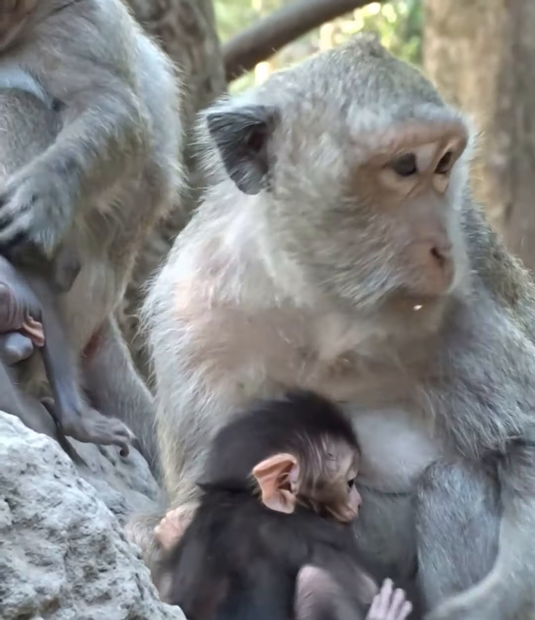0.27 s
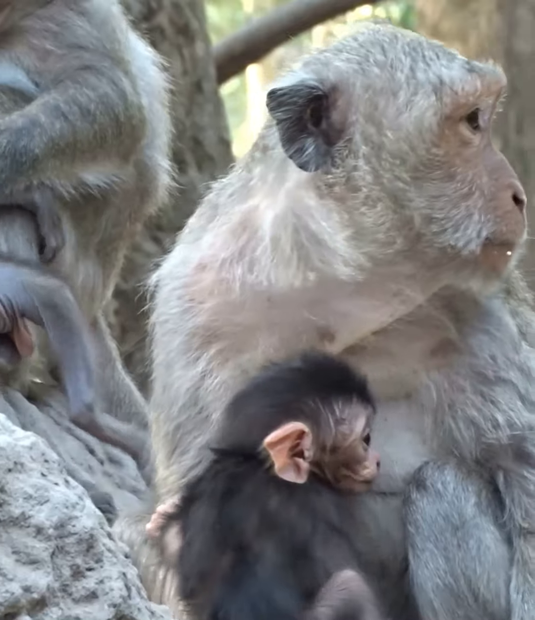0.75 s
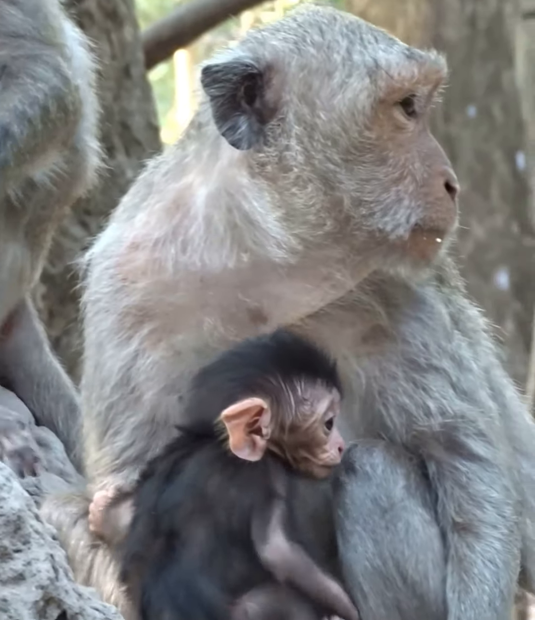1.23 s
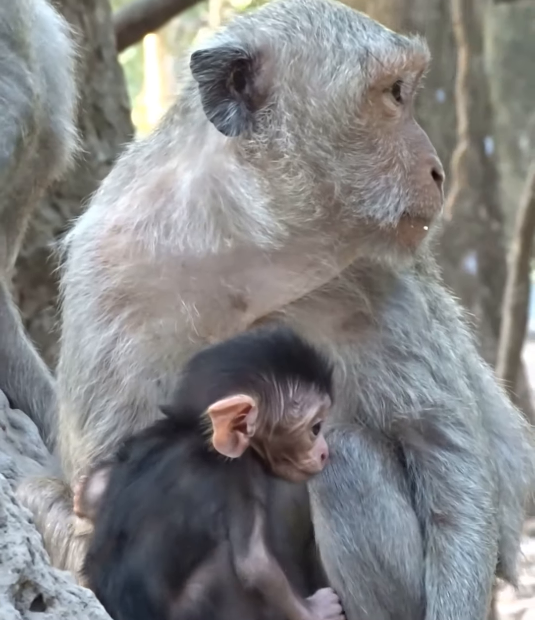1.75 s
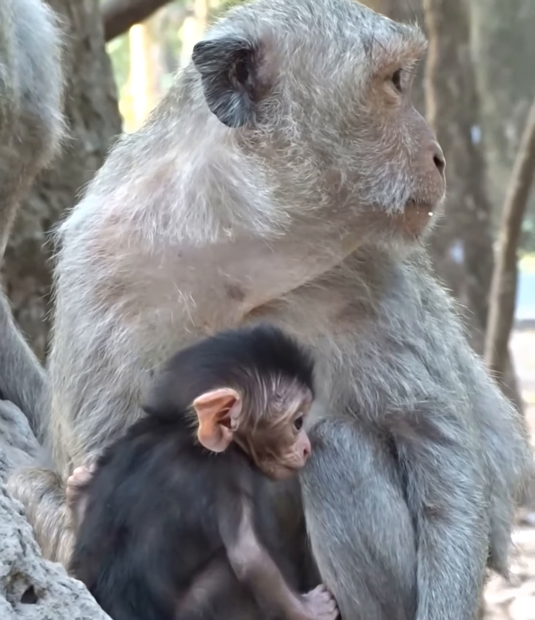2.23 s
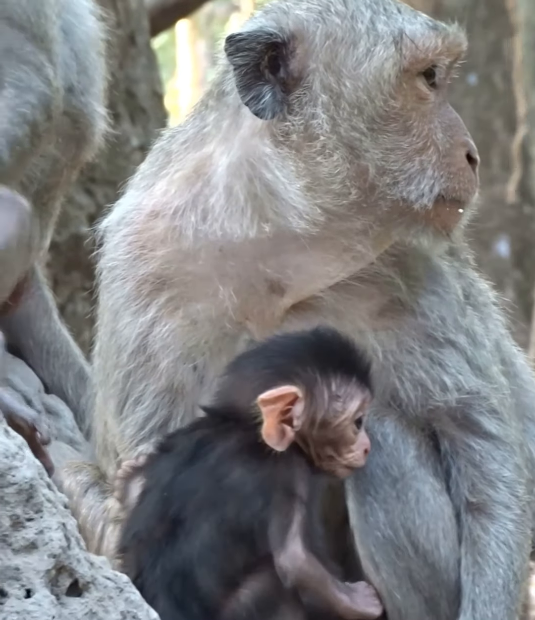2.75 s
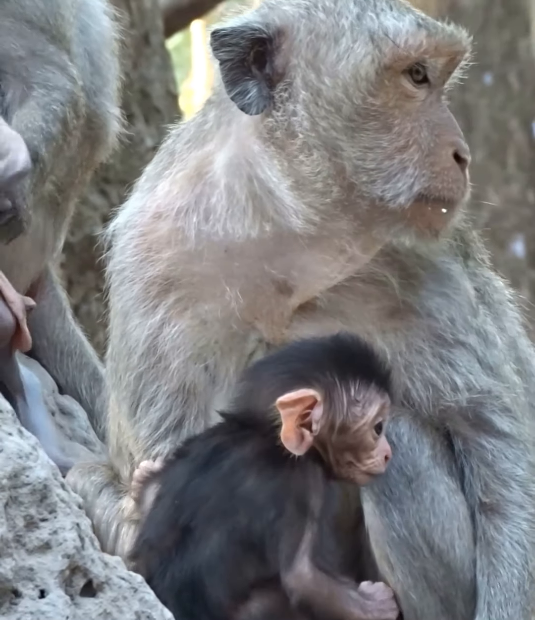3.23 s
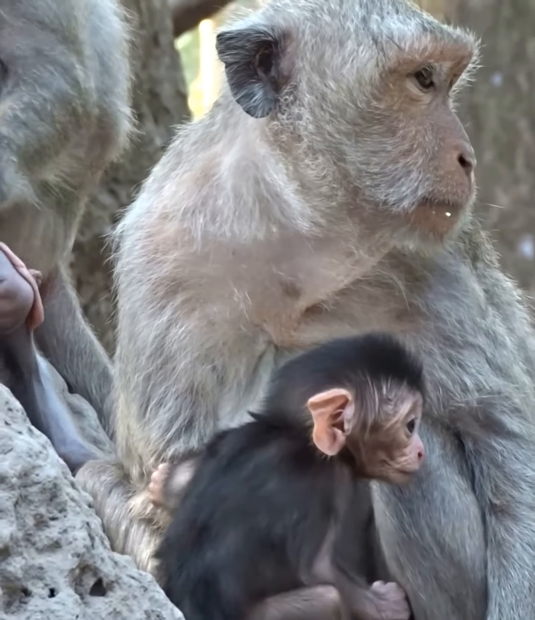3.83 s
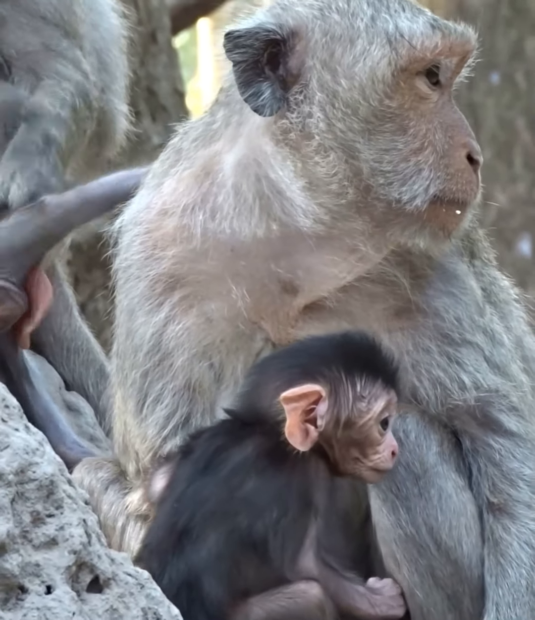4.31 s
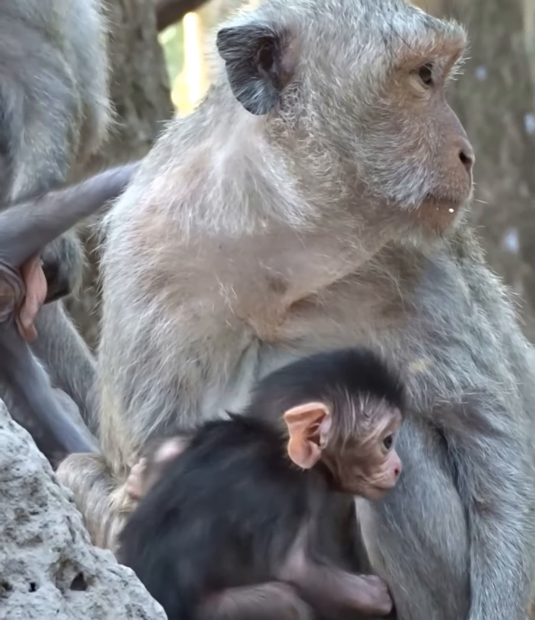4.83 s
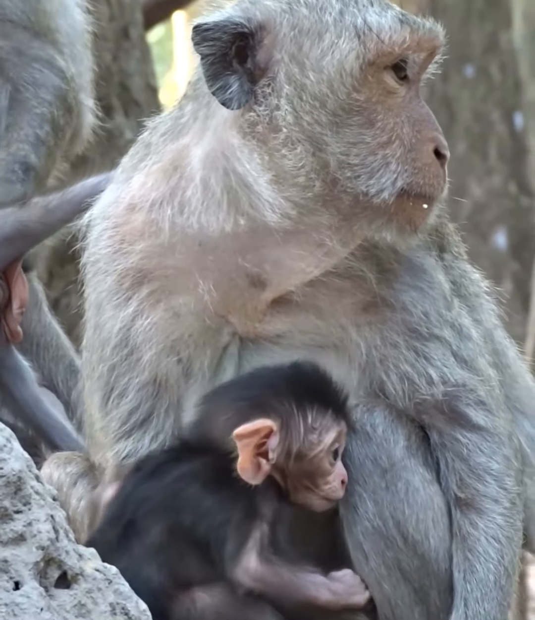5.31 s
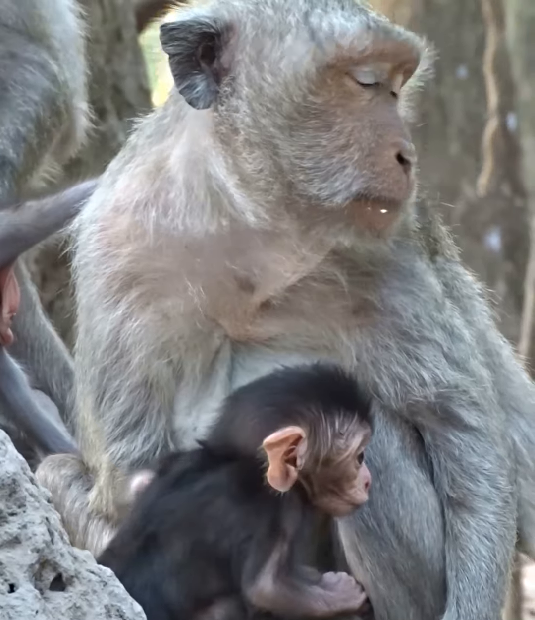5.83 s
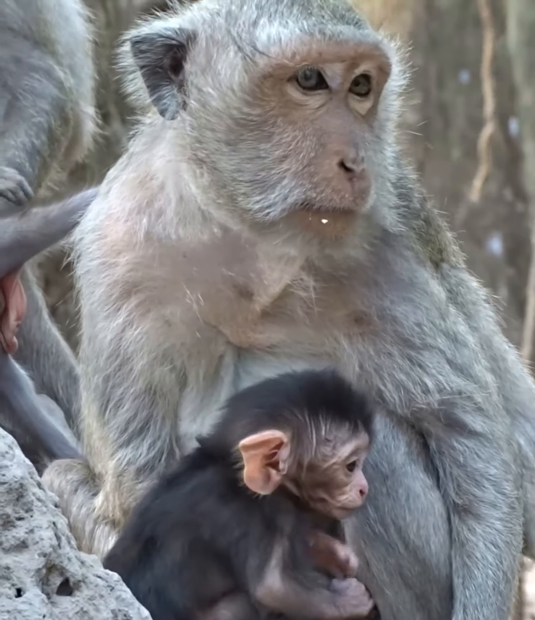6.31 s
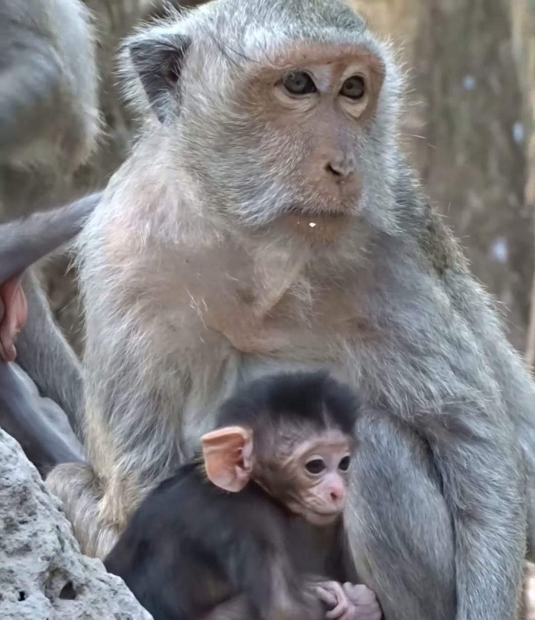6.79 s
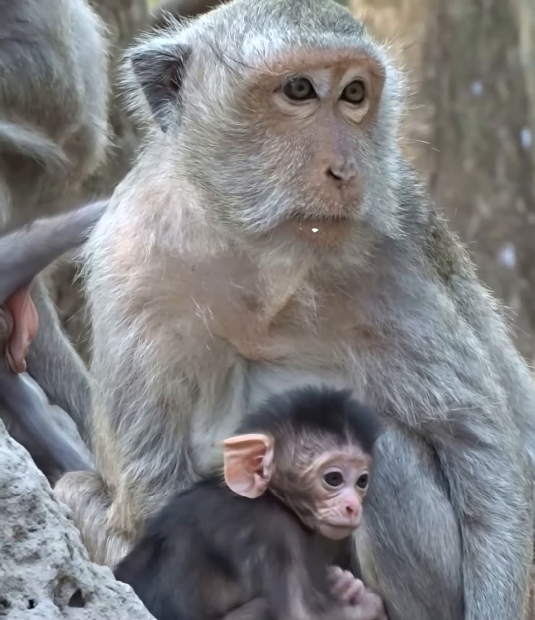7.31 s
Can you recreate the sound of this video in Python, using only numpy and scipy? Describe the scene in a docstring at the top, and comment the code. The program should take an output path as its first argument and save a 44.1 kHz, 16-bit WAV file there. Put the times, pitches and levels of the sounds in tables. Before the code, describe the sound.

A young monkey close by lets out one piercing squeak and a brief raspy scream about halfway through, the loudest sounds in an echoing wood. A second monkey, farther away, follows with a run of soft whimpers and a few cries that turn hoarse as they drop. Around them, high birds whistle and peep, animals scuff dry leaves, snap twigs and tap wood softly, while leaves hiss and traffic rumbles far off.

```python
"""A young macaque close by gives a pure squeak, then a rough scream: two tones mixing in one throat.
Further off among the trees another whimpers, then cries out, turning hoarse as its pitch falls.
Small birds whistle in the canopy, with thin peeps and faint far tones around them. Dry leaves rustle
and twigs snap under moving animals, wood is tapped softly, and the microphone clicks once. Trunks and
leaves scatter the calls into echoes, while the foliage hisses and distant traffic rumbles."""
import sys
import numpy as np
from scipy import signal
from scipy.fft import rfft, irfft, next_fast_len
from scipy.io import wavfile
from scipy.ndimage import map_coordinates

SR = 44100
rng = np.random.default_rng(int(sys.argv[2]) if len(sys.argv) > 2 else 0)


def wrap_up_sound(samples):
    """Save the sound to the file named by the first command line argument, as 16-bit audio."""
    columns = np.atleast_2d(samples).T
    # keep every value between -1 and 1, then stretch to whole-number steps
    tamed = np.clip(columns, -1, 1)
    steps = np.round(tamed * 32767).astype(np.int16)
    wavfile.write(sys.argv[1], SR, steps)


N = 332945
TIME = np.arange(N) / SR

# how wide a noise sounds: (frequency [Hz], side level minus middle level [dB])
STEREO_WIDTH = [(60, -29), (110, -22.5), (200, -16.5), (380, -9), (700, -6), (1290, -7), (2380, -6.5),
                (4400, -17), (8120, -18), (15000, -7)]
# the echo among the trunks: (frequency [Hz], time to fade by 60 dB [s])
ECHO_TIMES = [(300, 1.2), (3000, 1.38), (5000, 0.9), (7500, 0.6), (14000, 0.56)]
# tone colours of engines, tyres and foliage: (frequency [Hz], relative level [dB])
RUMBLE_COLOUR = [(13, -43), (22, -31), (41, -5.5), (92, -1), (119, -2), (263, -15.5), (420, -26.5),
                 (550, -65), (920, -120)]
TYRE_COLOUR = [(150, -35), (300, 0.5), (450, 2.5), (570, -1), (780, 2), (1000, -2), (1300, -6.5),
               (2000, -11), (3500, -12), (8000, -29)]
FOLIAGE_COLOUR = [(900, 1), (1900, -4.5), (2700, 2.5), (3300, 0.5), (4200, -2), (5300, 3.5), (7200, 6),
                  (9000, 2), (11000, -5.5), (13500, -10.5), (16000, -15)]
# vehicles swelling out of the rumble: (middle time [s], width [s], rise [dB])
VEHICLES = [(.9, 0.77, 1.2), (1.8, .15, 3.5), (2.7, 0.49, 2.5), (3.55, 0.37, 1.5), (4.45, 0.39, 3),
            (7.1, 0.52, 0.7)]
# how the tyre noise and the foliage swell and fade: (time [s], level [dB])
TYRE_LEVELS = [(0, -47.5), (1, -49.5), (3.85, -51.5), (4.15, -49), (7.55, -48)]
FOLIAGE_LEVELS = [(0, -53.5), (2.55, -54.5), (3.1, -46), (3.7, -47.5), (4.35, -44), (5.45, -46.5),
                  (6.45, -45.3), (7.55, -50)]
# two birds' sliding notes: (start [s], length [s], direction [1 up, -1 down], level [dB])
HIGH_BIRD_NOTES = [(-.03, 0.096, 1, -44.5), (.165, 0.13, -1, -48.5), (.302, 0.093, 1, -46),
                   (.885, .12, 1, -46.5), (1.47, 0.093, 1, -48), (2.01, 0.11, -1, -47.5),
                   (2.147, .14, 1, -49), (2.85, .1, 1, -46.5), (5.04, 0.14, -1, -49),
                   (5.191, .11, 1, -45.5), (6.416, .13, 1, -45.5)]
LOW_BIRD_NOTES = [(4.841, 0.061, 1, -55), (5.199, 0.071, 1, -51), (5.33, 0.093, -1, -63)]
# faint tones far off: (start [s], length [s], pitch [Hz], level [dB])
FAR_TONES = [(.8, .9, 2390, -63.5), (1.6, .85, 2390, -67), (1.95, .65, 3310, -64), (3.6, 2, 690, -60),
             (2.85, .2, 305, -54)]
# scuffs in the leaves: (middle time [s], width [s], level [dB], place [0 ahead to 1 right])
LEAF_SCUFFS = [(.24, 0.037, -50, 0), (1.56, .018, -49, 0), (1.61, 0.032, -47, 0), (2.24, 0.14, -50, 0.1),
               (2.77, 0.049, -41, 0.046), (3.02, 0.031, -51, 0), (3.195, 0.046, -40, 0),
               (4.31, 0.046, -40.5, 0), (5.02, 0.1, -43.5, 0), (6.16, 0.025, -33, .8),
               (6.207, 0.023, -34.5, 0.34), (6.54, 0.053, -42, 1), (6.67, .013, -42.5, 0.88),
               (6.74, 0.024, -45.5, 1), (6.94, 0.0056, -33, 0.87), (6.97, 0.038, -38, 1),
               (7.44, 0.0092, -38, 0.89), (7.49, 0.051, -38.5, 0.48)]
# twig snaps, and one sharp click on the microphone at 5.58 s:
# (time [s], level [dB], knock adjustment [dB])
SNAPS_AND_CLICK = [(1.5419, -36, -14), (2.569, -39, -14), (2.643, -35.5, -5.5), (3.175, -23, -4.5),
                   (4.288, -26.5, -11), (5.579, -28, 0.5), (6.1509, -32, -3), (6.5505, -29, -6),
                   (6.672, -33, -22), (6.8089, -33, -21), (6.9317, -26, -19), (7.4257, -32, -2)]
# tone colours of a scuff, a crack and a knock: (frequency [Hz], relative level [dB])
LEAF_COLOUR = [(150, 9), (700, 0.5), (1500, -4), (2800, 6.5), (4200, 0.5), (7500, 8.5), (10000, 1.5),
               (13000, -6), (16000, -12)]
CRACK_COLOUR = [(1500, -24), (4000, 6), (7500, 7.5), (11000, 3), (16000, -16)]
KNOCK_COLOUR = [(150, -10), (700, -2), (1400, 0), (2800, 0), (4500, -5), (8000, -16)]
# dull taps on wood: (time [s], level [dB], pitch [Hz])
WOOD_TAPS = [(1.555, -45.5, 1780), (1.6, -50, 2170), (2.78, -43, 1275), (4.548, -40.5, 2880),
             (4.79, -44, 1720), (5.33, -41, 1796), (6.2, -39, 2380), (6.23, -41, 387), (6.67, -39, 422)]
# the peeps; the near squeak with two soft notes before it: (start [s], length [s], first pitch [Hz],
# top pitch [Hz], last pitch [Hz], rise [s], fall [s], fade-in [s], level [dB])
PEEP_NOTES = [(2.28, 0.059, 7400, 7570, 7400, 0.025, .01, 0.035, -35),
              (2.34, .12, 7920, 8020, 6800, 0.0095, 0.12, .006, -35),
              (4.46, 0.045, 3950, 5450, 5450, 0.044, .005, .005, -38),
              (4.532, .105, 6550, 7240, 5500, 0.0146, 0.074, .008, -32)]
SQUEAK_NOTES = [(3.245, 0.055, 6270, 6290, 6160, .015, 0.017, 0.029, -34.5),
                (3.305, .016, 6260, 6300, 6290, .005, .005, 0.0046, -35),
                (3.322, .167, 6625, 7150, 4160, .072, .048, 0.0049, -12.5)]
# the far macaque's whimpers: (start [s], level [dB])
WHIMPER_RUN = [(3.299, -46), (3.619, -43), (3.95, -44), (4.24, -46), (4.559, -44), (4.921, -46),
               (5.242, -46)]
# a whimper's overtones: (multiple of the pitch, relative level [dB])
WHIMPER_OVERTONES = [(2, -8), (3, -1), (4, 4), (6, 2.5), (8, -35)]
# the scream's high tone: (time [s], pitch [Hz])
SCREAM_HIGH_TONE = [(3.764, 6930), (3.776, 7700), (3.797, 8560), (3.815, 8300), (3.865, 8820), (3.91, 8170),
                    (4.0, 8290), (4.027, 7170), (4.098, 7180)]
# bursts of the same throat's lower tone:
# (start [s], length [s], first pitch [Hz], last pitch [Hz], level [dB], roughness [0 clear, 1 up rough])
SCREAM_LOW_TONES = [(3.426, 0.02, 4800, 4730, -34, 0.1), (3.802, 0.037, 4800, 4670, -32, 1.1),
                    (3.846, 0.033, 4580, 4880, -26, 0.4), (3.898, .05, 4540, 5380, -26, 0.7),
                    (3.954, 0.041, 4980, 4860, -22.5, 0.14)]
# tone colour of the air rushing through that throat: (frequency [Hz], relative level [dB])
RASP_COLOUR = [(2500, -25), (3700, -13), (4600, 4.5), (6500, 3), (8800, 0.5), (10200, 0), (12500, -0.5),
               (14000, -14), (16000, -18)]
# how strongly the near voice beams into the trees: (frequency [Hz], relative level [dB])
VOICE_BEAM = [(5000, -10), (7000, -1), (8500, 2), (12500, -4), (14300, 10)]
# the far macaque's cries: (start [s], length [s], first pitch [Hz], top pitch [Hz], last pitch [Hz],
# rise [s], fall [s], level [dB], mouth resonance [Hz], roughness [0 to 1])
FAR_CRIES = [(5.595, 0.2, 773, 854, 830, 0.14, 0.018, -42, 2860, .55),
             (5.765, 0.25, 837, 1026, 866, .036, .11, -32.5, 3980, 0.17),
             (6.948, .265, 837, 1006, 907.5, .062, .16, -36, 3200, 0.44)]
# tone colour of its throat: (frequency [Hz], relative level [dB])
THROAT_COLOUR = [(900, -14), (2000, -7), (3000, -5.5), (4000, 0), (4700, -6), (5200, -2.5), (6100, -3),
                 (7100, -3), (8100, -12), (9100, -2), (10000, -19), (15000, -28)]


def amp(db):
    """Turn decibels into a number to multiply a sound by."""
    return 10 ** (np.asarray(db) / 20)


def unit(x):
    """Scale a sound to an average power of 1."""
    return x / np.sqrt(np.mean(x ** 2) + 1e-20)


def at_hz(table, hz):
    """Read a (frequency, value) table between its rows, on a musical pitch scale."""
    freqs, values = np.transpose(table)
    return np.interp(np.log(hz + 1), np.log(freqs + 1), values)


def at_time(table, t=TIME):
    """Read a (time, value) table between its rows."""
    return np.interp(t, *np.transpose(table))


def window(start, length):
    """The sample numbers of an event, and the time since its start."""
    i = np.flatnonzero((TIME >= start) & (TIME < start + length))
    return i, TIME[i] - start


def envelope(t, fade_in, fade_out):
    """A volume that rises, holds and falls to nothing at the end of t."""
    return np.clip(t / fade_in, 0, 1) * np.clip((t[-1] - t) / fade_out, 0, 1)


def wobble(rate, size=N):
    """A smooth curve through `rate` random values a second."""
    points = rng.standard_normal(int(size * rate / SR) + 4)
    return map_coordinates(points, [np.arange(size) * rate / SR])


def phase_of(hz):
    """How far a wave has turned, in radians, as it follows a pitch curve."""
    return 2 * np.pi * np.cumsum(hz) / SR


def arch(t, from_hz, top_hz, end_hz, rise, fall, rise_bend, fall_bend):
    """The pitch of a call: it climbs to its top, holds and drops."""
    up = np.clip(t / rise, 0, 1) ** rise_bend
    down = np.clip(1 - (t[-1] - t) / fall, 0, 1) ** fall_bend
    return from_hz + (top_hz - from_hz) * up + (end_hz - top_hz) * down


def filtered(x, response):
    """Multiply each frequency in x by response(frequency)."""
    size = next_fast_len(N + SR // 4)
    return irfft(rfft(x, size) * response(np.fft.rfftfreq(size, 1 / SR)), size)[..., :N]


def noise(colour, wider_db=0):
    """Stereo noise of a given tone colour; its bass is nearly the same in both ears."""
    def response(hz):
        side_db = np.minimum(at_hz(STEREO_WIDTH, hz) + wider_db, -3)
        return amp(at_hz(colour, hz)) * amp([0 * hz, side_db])
    mid, side = filtered(rng.standard_normal((2, N)), response)
    return unit(np.array([mid + side, mid - side]))


def among_trees(x, echo_db, side_db, build_s=0.0076):
    """A sound plus its echo off trunks and leaves; the treble dies first."""
    hz, t, spectrum = signal.stft(rng.standard_normal((2, SR)), SR, nperseg=256)
    decay = amp(-60 * t / at_hz(ECHO_TIMES, hz)[:, None])
    tail = signal.istft(spectrum * decay, SR, nperseg=256)[1]
    tail *= 1 - np.exp(-(np.arange(tail.shape[1]) / SR / build_s) ** 2)
    mid, side = signal.fftconvolve(x[None], tail / np.linalg.norm(tail[0]), axes=1)[:, :N]
    side = side * amp(side_db)
    return (x + amp(echo_db) * np.array([mid + side, mid - side])) / np.sqrt(1 + amp(echo_db) ** 2)


def traffic(rumble_db=-40.5, throb_db=0.5):
    """A distant rumble that swells as vehicles pass, with tyre noise a little to the left."""
    swell_db = sum(db * np.exp(-((TIME - middle) / width) ** 2) for middle, width, db in VEHICLES)
    rumble = unit(noise(RUMBLE_COLOUR) * amp(throb_db * wobble(25)))
    tyres = amp(at_time(TYRE_LEVELS)) * noise(TYRE_COLOUR) * amp([[.55], [-.55]])
    return amp(rumble_db + swell_db) * rumble + tyres


def foliage(boost_db=1.5):
    """Stirring leaves make a faint, grainy hiss."""
    stir_db = .5 * wobble(14)
    hiss = unit(noise(FOLIAGE_COLOUR) * amp(stir_db + 1.5 * wobble(500)))
    return amp(at_time(FOLIAGE_LEVELS) + boost_db) * hiss


def bird_slides(notes, low_hz, high_hz, bend=.9):
    """One bird whistles pure notes that slide up or down across its range."""
    out = np.zeros(N)
    for start, length, direction, db in notes:
        i, t = window(start, length)
        from_hz, to_hz = (low_hz, high_hz) if direction > 0 else (high_hz, low_hz)
        hz = from_hz + (to_hz - from_hz) * (t / length) ** bend
        swell = np.sqrt(np.abs(np.sin(np.pi * t / length)))
        waver = 1 + .014 * wobble(300, len(i))
        out[i] += np.sqrt(2) * amp(db) * swell * np.sin(phase_of(hz * waver))
    return out


def birds():
    """Two birds in the canopy, heard mostly by their echo."""
    high = bird_slides(HIGH_BIRD_NOTES, low_hz=4540, high_hz=7300)
    low = bird_slides(LOW_BIRD_NOTES, low_hz=2105, high_hz=2550)
    return among_trees(high + low, echo_db=5.5, side_db=-10, build_s=.015)


def far_tones(first_pip_s=-0.053, every_s=.445, pip_s=0.12, pip_hz=2840, pip_db=-61.5):
    """A distant bird repeats one pip six times; a few other faint tones waver far off."""
    out = np.zeros(N)
    pips = [(first_pip_s + k * every_s, pip_s, pip_hz, pip_db) for k in range(6)]
    for start, length, hz, db in FAR_TONES + pips:
        i, _ = window(start, length)
        waver_hz = 22 * wobble(150, len(i))
        out[i] += np.sqrt(2) * amp(db) * signal.windows.tukey(len(i)) * np.sin(phase_of(hz + waver_hz))
    return among_trees(out, echo_db=0, side_db=-4.5) * amp([[.8], [-.8]])


def leaf_scuffs(grain_db=3):
    """Animals brush through dry leaves: grainy swells of noise, ahead and (wider) on the right."""
    ahead_power, right_power = np.zeros((2, N))
    for middle, width, db, place in LEAF_SCUFFS:
        power = amp(2 * db) * np.exp(-np.minimum(((TIME - middle) / width) ** 2, 100))
        ahead_power += (1 - place) * power
        right_power += place * power
    grain = amp(grain_db * wobble(700))
    ahead = np.sqrt(ahead_power) * unit(noise(LEAF_COLOUR) * grain)
    right = np.sqrt(right_power) * unit(noise(LEAF_COLOUR, wider_db=3.5) * grain)
    return ahead + right * amp([[-1], [1]])


def snaps_and_click(crack_db=-4, knock_db=-3):
    """Twig snaps and one sharp click on the microphone: each is a bright crack with a duller knock."""
    crack, knock = np.zeros((2, N))
    for start, db, adjust_db in SNAPS_AND_CLICK:
        i, t = window(start, .15)
        fade = amp(db - 60 * t / .015) + amp(db - 16 - 60 * t / .12)  # a sharp burst, then a soft tail
        crack[i] += amp(crack_db) * fade
        knock[i] += amp(knock_db + adjust_db) * fade
    return crack * noise(CRACK_COLOUR) + knock * noise(KNOCK_COLOUR)


def wood_taps(ring_s=0.11, fade_in_s=0.00095, blur=0.3):
    """A soft touch makes wood ring briefly: a narrow band of noise around one pitch."""
    out = np.zeros(N)
    t = np.arange(SR // 8) / SR
    for start, db, hz in WOOD_TAPS:
        flicker = wobble(blur * hz, len(t)) + 1j * wobble(blur * hz, len(t))
        ring = unit((flicker * np.exp(2j * np.pi * hz * t)).real)
        fade = amp(db - 60 * t / ring_s) * (1 - np.exp(-t / fade_in_s))
        out[round(start * SR):][:len(t)] += fade * ring
    return among_trees(out, echo_db=-13.5, side_db=-1)


def arched_notes(notes, octave_db, jitter, rise_bend, fall_bend):
    """Nearly pure notes with a weak octave above, loudest at the top of their pitch."""
    out = np.zeros(N)
    for start, length, from_hz, top_hz, end_hz, rise, fall, fade_in, db in notes:
        i, t = window(start, length)
        hz = arch(t, from_hz, top_hz, end_hz, rise, fall, rise_bend, fall_bend)
        softer_db = 17 * np.tanh(np.log2(top_hz / hz) / 0.2)
        level = amp(db - softer_db) * envelope(t, fade_in, fade_out=0.0025)
        phase = phase_of(hz * (1 + jitter * wobble(397, len(i)) + 0.0034 * wobble(54, len(i))))
        out[i] += np.sqrt(2) * level * (np.sin(phase) + amp(octave_db) * np.sin(2 * phase))
    return out


def peeps():
    """Short, slightly hoarse peeps from a little way off."""
    voice = arched_notes(PEEP_NOTES, octave_db=-24, jitter=.013, rise_bend=1.1, fall_bend=1.6)
    return among_trees(voice, echo_db=-3, side_db=-13)


def near_macaque():
    """A clean squeak, then the scream; the treble beams into the trees and returns as an echo."""
    squeak = arched_notes(SQUEAK_NOTES, octave_db=-32, jitter=0.0043, rise_bend=1.9, fall_bend=2.9)
    voice = squeak + scream()
    beamed = filtered(voice, lambda hz: amp(at_hz(VOICE_BEAM, hz)))
    echo = among_trees(beamed, echo_db=35, side_db=-12, build_s=0.004)
    return voice + amp(-6.5) * echo


def far_whimpers(first_hz=890, tiring_hz_per_s=19, droop_hz_per_s=110):
    """Hoarse, drooping whimpers, about three a second, each a little lower as the voice tires."""
    out = np.zeros(N)
    for start, db in WHIMPER_RUN:
        i, t = window(start, length=0.38)
        hz = first_hz - tiring_hz_per_s * (start - WHIMPER_RUN[0][0]) - droop_hz_per_s * t
        waver = .024 * wobble(300, len(i)) + .012 * wobble(18, len(i))
        phase = phase_of(hz * (1 + waver))
        voice = unit(sum(amp(level) * np.sin(k * phase) for k, level in WHIMPER_OVERTONES))
        out[i] += amp(db) * envelope(t, fade_in=0.02, fade_out=0.35) * voice
    return among_trees(out, echo_db=-1, side_db=-8.5)


def vocal_fold(hz, rough, jitter, scatter, blur_hz):
    """A vibrating vocal fold, as a complex wave; roughness breaks its tone into random bursts."""
    size = len(hz)
    rough = np.clip(rough, 0, 1)
    phase = phase_of(hz * (1 + jitter * rough * wobble(500, size)))
    flicker = wobble(blur_hz, size) + 1j * wobble(blur_hz, size)
    drive = (1 - rough) + scatter * np.sqrt(rough) * flicker
    swing = drive / np.sqrt(1 + np.abs(drive) ** 2)  # the fold can only swing so far
    return np.sqrt(2) * swing / np.sqrt(np.mean(np.abs(swing) ** 2)) * np.exp(1j * phase)


def scream(high_db=-19, rasp_db=-28, break_at_s=3.797, break_s=0.019, recover_s=.235):
    """Two tones in one throat mix into new ones, over a rasp of rushing air."""
    high, low = np.zeros((2, N), complex)
    since_break = TIME - break_at_s  # the voice suddenly turns rough, then clears steadily
    rough = np.clip(1.5 * np.minimum(since_break / break_s, 1 - since_break / recover_s), 0, 1)
    i = np.flatnonzero((TIME >= SCREAM_HIGH_TONE[0][0]) & (TIME <= SCREAM_HIGH_TONE[-1][0]))
    hz = at_time(SCREAM_HIGH_TONE, TIME[i])
    tone = vocal_fold(hz, rough[i] + 0.065, jitter=.025, scatter=.8, blur_hz=850)
    flutter_db = 2.7 * rough[i] * wobble(44, len(i))
    fade = envelope(TIME[i] - TIME[i[0]], fade_in=0.016, fade_out=.055)
    high[i] = amp(high_db + flutter_db) * fade * tone
    for start, length, from_hz, to_hz, db, roughness in SCREAM_LOW_TONES:
        i, t = window(start, length)
        hz = np.linspace(from_hz, to_hz, len(i))
        tone = vocal_fold(hz, roughness, jitter=.03, scatter=.6, blur_hz=800)
        low[i] += amp(db) * envelope(t, fade_in=0.0073, fade_out=0.0073) * tone
    # multiplying complex waves adds their pitches; with conj() it subtracts them
    beat = high * low.conj()
    mixed = amp(3) * high * low + amp(19) * high * beat + amp(36) * beat ** 2 + amp(-14) * high ** 2
    rasp = amp(rasp_db) * np.sqrt(rough) * noise(RASP_COLOUR)[0]
    return (high + low + mixed).real + rasp


def far_cries(resting_mouth_hz=2830, mouth_width_hz=650, slack_octaves=0.14):
    """Arched cries turn hoarse and dull as they fall; the mouth boosts overtones near its resonance."""
    out = np.zeros(N)
    k = np.arange(1, 15)[:, None]  # multiples of the pitch
    for start, length, from_hz, top_hz, end_hz, rise, fall, db, open_hz, roughness in FAR_CRIES:
        i, t = window(start, length)
        hz = arch(t, from_hz, top_hz, end_hz, rise, fall, rise_bend=0.98, fall_bend=1.3)
        slack = np.clip(np.log2(top_hz / hz) / slack_octaves, 0, 1)  # 0 at the top pitch, 1 well below
        rough = np.clip(roughness + .7 * slack, 0, 1)
        mouth_hz = open_hz + (resting_mouth_hz - open_hz) * slack ** 2
        phase = phase_of(hz * (1 + .028 * rough * wobble(600, len(i))))
        mouth_db = (8 - 7.5 * slack) * np.exp(-((k * hz - mouth_hz) / mouth_width_hz) ** 2)
        dulling_db = 9 * rough * np.minimum(np.abs(np.log2(k * hz / mouth_hz)), 1)
        gains = amp(at_hz(THROAT_COLOUR, k * hz) + mouth_db - dulling_db)
        swell_db = 3 * (np.sin(np.pi * t / length) - 1)
        level = amp(db + swell_db - 2.5 * slack) * envelope(t, fade_in=0.0067, fade_out=0.0067)
        out[i] += np.sqrt(2) * level * (gains * np.sin(k * phase)).sum(0) / np.linalg.norm(gains, axis=0)
    return among_trees(out, echo_db=-2.5, side_db=-7, build_s=.03) * amp([[1.3], [-1.3]])  # to the left


def scene():
    """All the sounds added together, in stereo."""
    calls = near_macaque() + far_cries() + far_whimpers() + peeps() + birds() + far_tones()
    return calls + leaf_scuffs() + snaps_and_click() + wood_taps() + traffic() + foliage()


def record(dry, top_hz=15830):
    """Cut away the very highest treble."""
    return filtered(dry, lambda hz: hz < top_hz)


dry = scene()
out = record(dry)
wrap_up_sound(out)
```